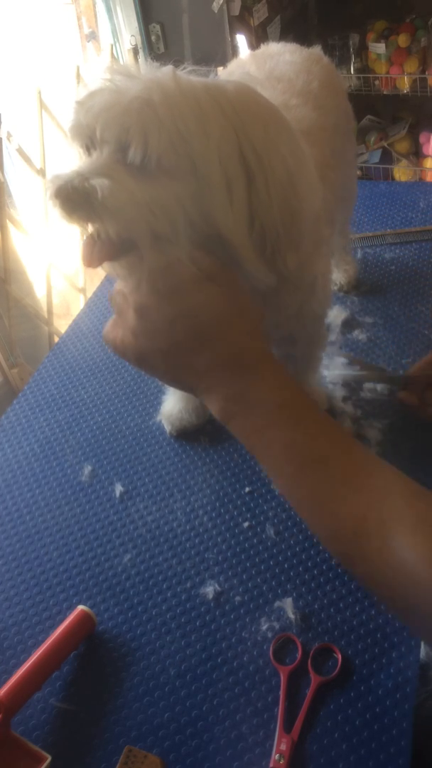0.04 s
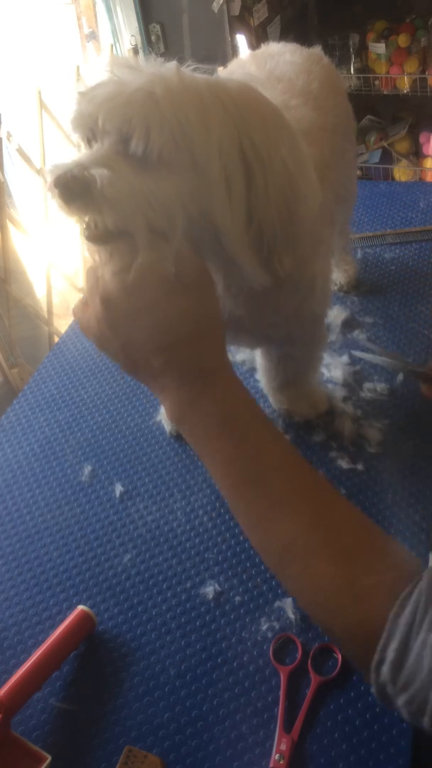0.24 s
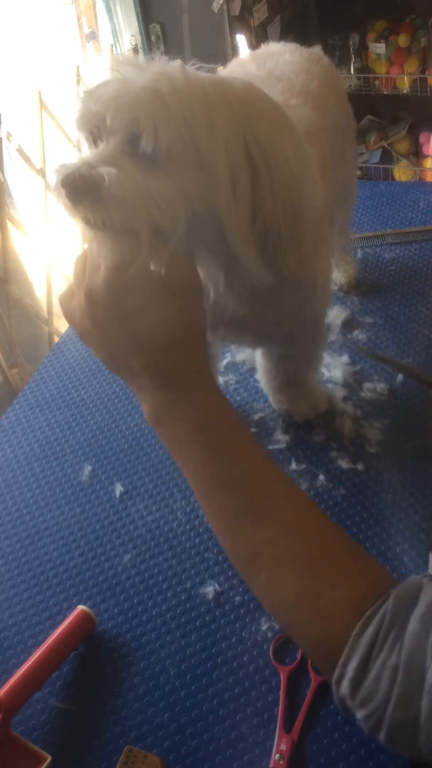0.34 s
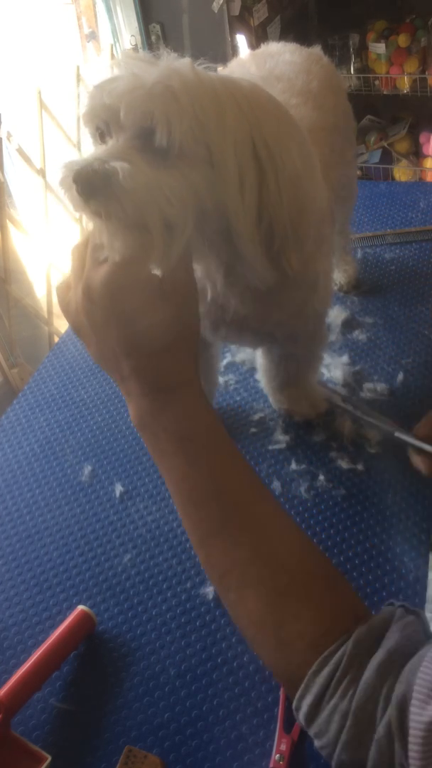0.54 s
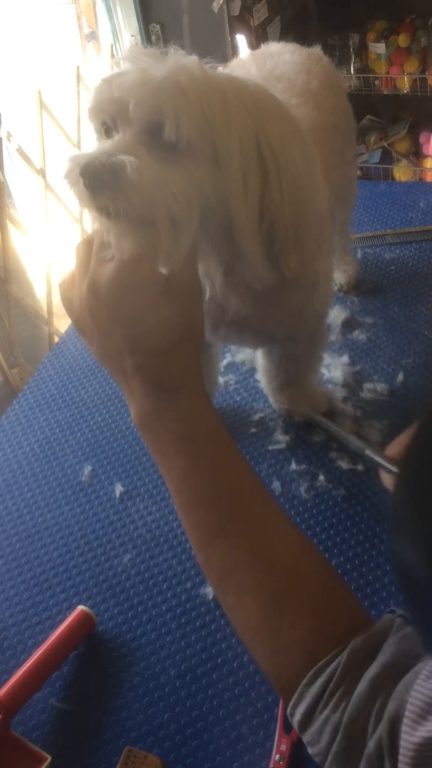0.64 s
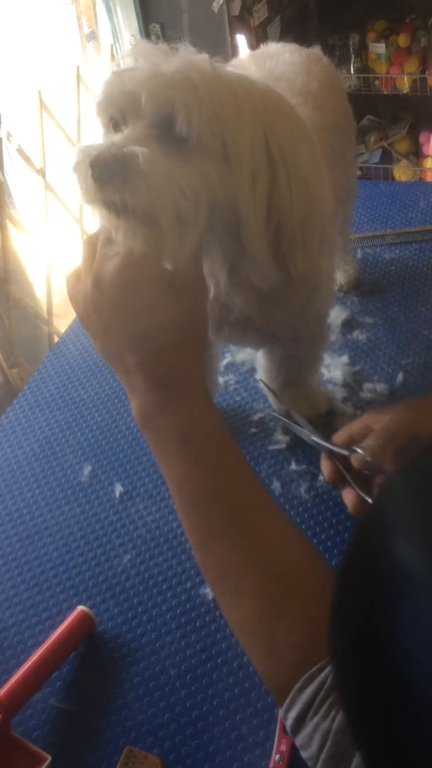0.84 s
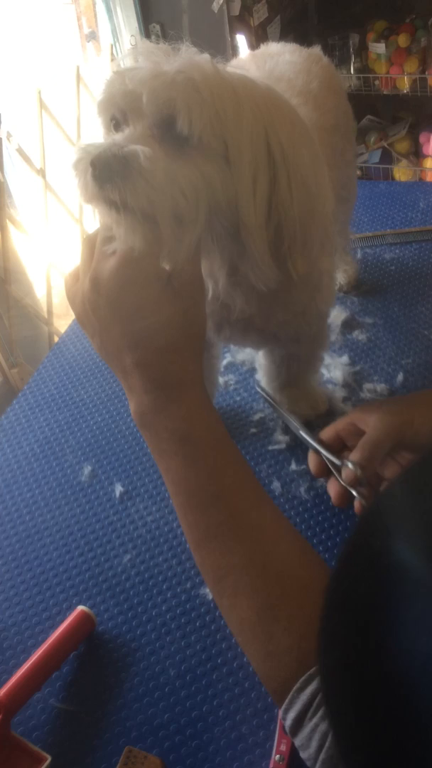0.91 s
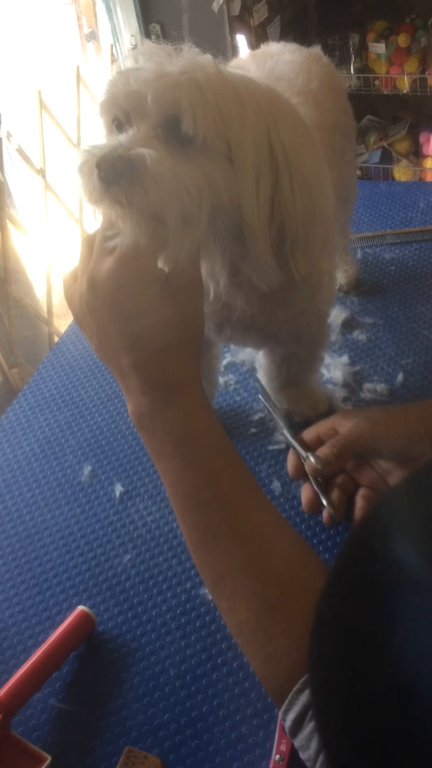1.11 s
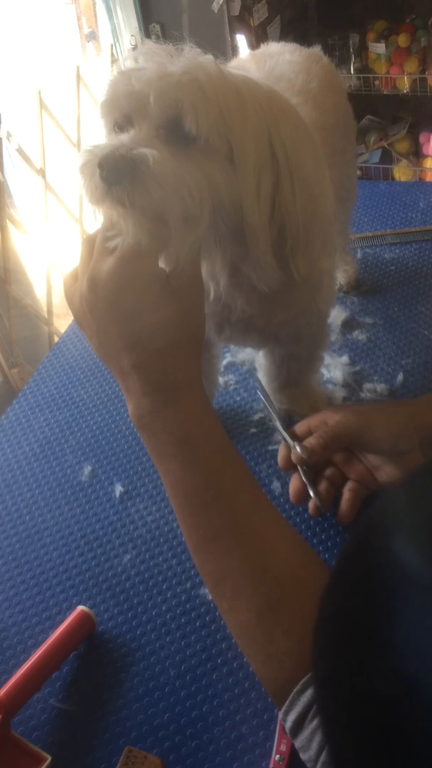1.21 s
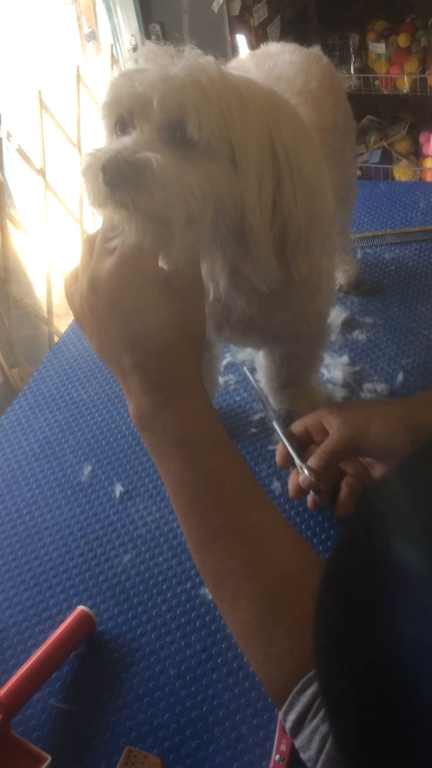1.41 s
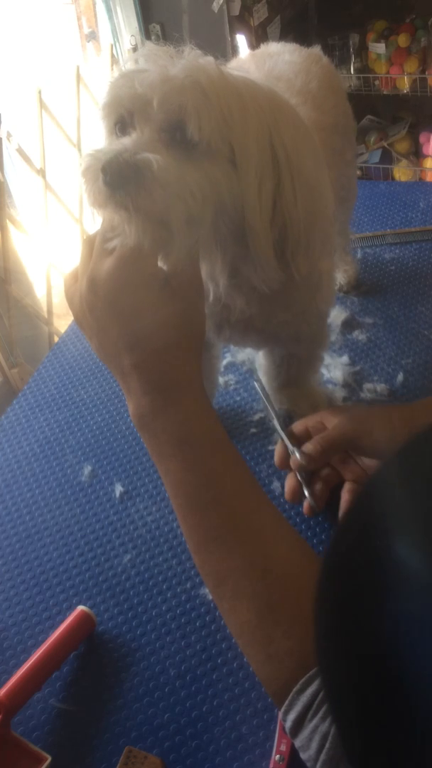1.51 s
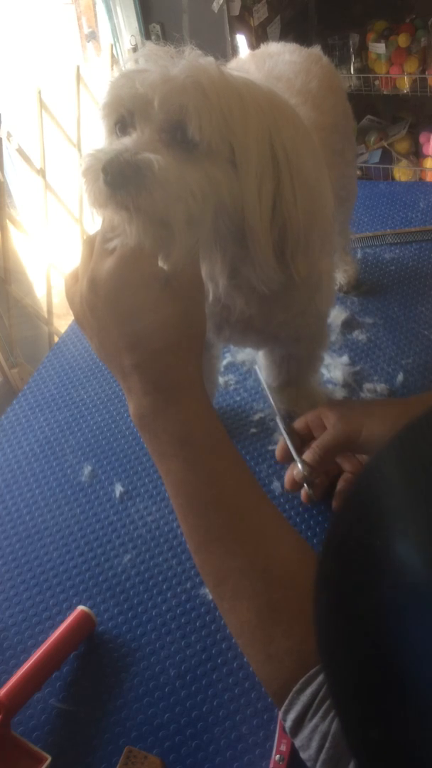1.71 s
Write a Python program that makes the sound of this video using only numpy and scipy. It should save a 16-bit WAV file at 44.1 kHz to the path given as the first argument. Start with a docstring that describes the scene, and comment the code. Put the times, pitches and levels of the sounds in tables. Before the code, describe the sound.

Close scissors snip in a small room, the blades rasping with a thin squeak and clicking shut four times, leaving a faint steel ring. The grooming table thuds softly while distant traffic hums throughout.

```python
"""Steel grooming scissors trim a dog's leg on a table in a small room. A click's steel tail fades first,
over distant traffic in the room's low resonances. Each stroke then rasps with a thin friction squeak.
Two full closings end in sharp clacks, the impact ringing the steel, among soft bumps from the table.
Lighter strokes and faint ticks follow, then two more clacks; thin notes linger under the last stroke."""
import sys
import numpy as np
from scipy import signal
from scipy.fft import rfft, irfft
from scipy.io import wavfile
from scipy.ndimage import uniform_filter1d

SR = 44100
rng = np.random.default_rng(int(sys.argv[2]) if len(sys.argv) > 2 else 0)


def transcribe(signal):
    """Save signal, clipped to [-1, 1], as a 16-bit WAV file at the path in sys.argv[1]."""
    frames = np.atleast_2d(signal).T
    limited = np.clip(frames, -1, 1)
    pcm = np.round(limited * 32767).astype(np.int16)
    wavfile.write(sys.argv[1], SR, pcm)


N = 77175
TIME = np.arange(N) / SR


# the fading steel tail of a click at the very start, then blade strokes:
# (peak time [s], rise [s], fall [s], level [dB], relative squeak [dB])
CLICK_TAIL_AND_STROKES = [(0.001, 0.018, 0.05, -40.5, -32), (0.141, 0.021, 0.046, -42, 1),
                          (0.21, 0.017, 0.039, -33.5, 0.5), (0.368, .022, 0.023, -32, -1.5),
                          (0.399, 0.01346, 0.017, -49, -26), (0.436, .018, .034, -30, -4.5),
                          (0.602, 0.027, 0.022, -36, -1.5), (0.705, .026, .04, -45.5, -10),
                          (0.859, 0.026, 0.035, -38.5, -0.5), (1.048, 0.018, 0.0305, -35, 2),
                          (1.204, 0.03, 0.023, -36.5, 1.5), (1.478, 0.016, .024, -37, 2.5),
                          (1.624, 0.024, .022, -39, 0.5)]
# modes of the blades: (frequency [Hz], bandwidth [Hz], gain [dB])
BLADE_MODES = [(4230, 560, -14.5), (6190, 570, -11), (8270, 1430, -9), (10130, 620, -2), (11420, 194, 0.5),
               (12990, 330, -2), (14500, 400, -1), (15300, 300, -11.5), (15700, 540, -7.5)]

def blade_friction():
    """Stick-slip friction: dense slips excite the blades, and a squeak's pitch follows their speed.
    The same blade modes sound the click's fading tail at the very start."""
    rasp_gain_db, rasp_drop_db, squeak_gain_db, squeak_drop_db = -4, 36, -5, 31
    squeak_hz, sag_hz, waver_hz = 10550, 1700, 310
    slips_per_s = 2200
    rasp_envelope, squeak_envelope, speed = np.zeros((3, N))
    for peak, rise, fall, db, squeak_db in CLICK_TAIL_AND_STROKES:
        # 0 at the peak, 1 at either end
        away = np.minimum(np.maximum((peak - TIME) / rise, (TIME - peak) / fall), 2)
        rasp_envelope += from_db(db - rasp_drop_db * away ** 1.75) * (away < 2)
        squeak_envelope += from_db(db + squeak_db - squeak_drop_db * away ** 2)
        speed = np.maximum(speed, 1 - away ** 2)
    slips = (rng.random(N) < slips_per_s / SR) * rng.choice([-1, 1], N)
    slip_size = from_db(3.8 * np.minimum(rng.exponential(1, N), 4))
    grip = from_db(3 * drift(170))
    rasp = unit_rms(resonate(slips * slip_size * grip, BLADE_MODES))
    pitch = squeak_hz - sag_hz * (1 - speed) + waver_hz * drift(324)
    squeak = unit_rms(sine(pitch) * from_db(4.5 * drift(167)))
    return (from_db(rasp_gain_db) * rasp_envelope * rasp
            + from_db(squeak_gain_db) * squeak_envelope * squeak)


# full closings, then light touches of the blades:
# (time [s], level [dB], bass gain [dB], treble gain [dB], rebound delay [s], rebound gain [dB])
CLOSING_CLACKS = [(0.2244, -20.5, 0, 1, .0025, -7), (0.4440, -15.5, -1, 9, .0016, -2),
                  (1.0639, -19, 3, -3, .0009, 0), (1.4936, -21, 3, -2, .0016, -2)]
BLADE_TOUCHES = [(0.1268, -69, 0, 6, 0.0014, -3), (0.3520, -76, 5, 8, .002, -10),
                 (0.5780, -46, -2, 11, 0.000654, -12), (0.768, -40, 6, -3, 0.002, -23),
                 (1.181, -50, -3, 3, .002, -3), (1.454, -49.5, 39, -7, 0.0027, -7)]
# modes of the struck scissors: (frequency [Hz], bandwidth [Hz], level [dB])
SCISSOR_MODES = [(2850, 700, -25), (4100, 350, -18.5), (4450, 300, -15), (5900, 600, -19), (7070, 130, -3),
                 (7750, 400, -9), (8430, 300, -3), (9400, 550, -8), (10600, 550, -12), (11500, 400, -8),
                 (12380, 320, -1), (12850, 260, -1.5), (14170, 300, -5), (14550, 250, -12),
                 (15450, 300, -17)]

def blade_impacts():
    """Impact excitation: a hit, a rebound and brief chatter ring the modes of the hand-damped steel."""
    bass_edge_hz, treble_edge_hz, mode_spread_db = 6400, 13500, 2
    chatter_s, chatter_db = .0013, 1
    out, t = np.zeros(N), TIME[:SR // 16]
    for start, db, bass_db, treble_db, rebound_s, rebound_db in CLOSING_CLACKS + BLADE_TOUCHES:
        ring = 0
        for hz, width, mode_db in SCISSOR_MODES:
            hits = rng.standard_normal((2, len(t))) * np.exp(-t / chatter_s)
            hits *= from_db(chatter_db) / np.linalg.norm(hits, axis=1, keepdims=True)
            hits[:, 0] += rng.choice([-1, 1], 2)  # an impulse leads each burst of chatter
            force = hits[0] + from_db(rebound_db) * np.roll(hits[1], int(rebound_s * SR))
            colour_db = bass_db * (hz < bass_edge_hz) + treble_db * (hz > treble_edge_hz)
            colour_db += mode_spread_db * rng.standard_normal()
            ring += from_db(mode_db + colour_db) * unit_rms(resonate(force, [(hz, width, 0)]))
        add(out, start, at_level(ring, db, window=88))
    return signal.sosfilt(signal.butter(2, 1500, "high", fs=SR, output="sos"), out + 1e-18)


# notes of the free blades: (time [s], frequency [Hz], level [dB], 60 dB decay time [s])
BLADE_NOTES = [(0.444, 4540, -60, .6), (1.17, 4560, -62, 1.2), (1.40, 11280, -63, 4.0),
               (1.63, 14400, -70, 2.5)]

def blade_ringing():
    """Free vibration: thin, wavering steel notes outlast the strokes and decay exponentially."""
    waver_hz, flutter_db, rise_s = 50, 2.5, .08
    out = np.zeros(N)
    rise = np.minimum(TIME / rise_s, 1)
    for start, hz, db, t60 in BLADE_NOTES:
        note = sine(hz + waver_hz * drift(100))
        gain = from_db(db + flutter_db * drift(30))
        add(out, start, gain * rise * note * decay(TIME, t60))
    return out


# soft bumps on the table: (time [s], thud level [dB], knock level [dB])
TABLE_BUMPS = [(0.171, -45, -55), (0.217, -44, -72), (0.476, -33, -53), (0.553, -68, -46),
               (0.607, -56, -48), (1.112, -40, -49.5), (1.396, -60, -43.5)]
# modes of the thud, then of the knock: (frequency [Hz], bandwidth [Hz], gain [dB])
TABLE_LOW_MODES = [(61.6, 18, -2.5), (101.4, 12.3, 9.5), (167, 30, -19.5)]
TABLE_MID_MODES = [(230, 68, 3.5), (490, 92, 8), (720, 316, 0), (1250, 870, -14)]

def table_bumps():
    """Damped resonance: the table answers an impulse with a thud and a short scuff with a dull knock."""
    scuff_s = .017
    out, t = np.zeros(N), TIME[:SR // 3]
    lowpass = signal.butter(2, 300, fs=SR, output="sos")
    for start, thud_db, knock_db in TABLE_BUMPS:
        thud = signal.sosfilt(lowpass, resonate(signal.unit_impulse(len(t)), TABLE_LOW_MODES))
        scuff = rng.standard_normal(len(t)) * np.exp(-t / scuff_s)
        knock = resonate(scuff, TABLE_MID_MODES)
        add(out, start, at_level(thud, thud_db, window=441) + at_level(knock, knock_db, window=441))
    return out


# faint, duller ticks further off: (time [s], level [dB])
DISTANT_TICKS = [(0.718, -53.5), (0.920, -62)]

def distant_ticks():
    """Diffuse field: far ticks arrive mostly as reverberation, a decaying wash of filtered noise."""
    out, t = np.zeros(N), TIME[:SR // 4]
    for start, db in DISTANT_TICKS:
        wash = rng.standard_normal(len(t)) * decay(t, t60=.23)
        tick = resonate(wash, [(7050, 2600, -2.02), (8840, 390, .17)])
        add(out, start, at_level(tick, db, window=220))
    return out


# spectrum of distant traffic and room air: (frequency [Hz], relative spectral density [dB])
TRAFFIC_SPECTRUM = [(20, -34), (40, 5.5), (55, 5), (80, 6), (130, 0), (168, 3), (240, -7.5), (310, -8.5),
                    (385, -16.5), (470, -9), (800, -10.5), (1100, -12), (1500, -19.5), (2400, -20),
                    (3200, -26), (4500, -27.5), (7000, -33.5), (10000, -42), (16000, -62.5)]
# swell of two room modes: (time [s], lower mode level [dB], upper mode level [dB])
ROOM_MODE_LEVELS = [(0.0, -66, -48.5), (0.048, -39.5, -46.5), (0.112, -47.5, -62), (0.154, -54, -64),
                    (0.224, -33.5, -47.5), (0.336, -55.5, -65), (0.496, -39.5, -40.5), (0.554, -47, -55),
                    (0.672, -41.5, -39.5), (0.814, -35.5, -70), (0.9, -48.5, -49.5), (0.926, -44, -52),
                    (1.11, -41, -46.5), (1.262, -50.5, -61.5), (1.418, -49, -46.5), (1.53, -67, -68.5),
                    (1.636, -69, -47.5), (1.75, -59, -50.5)]

def traffic():
    """Standing waves: two low room modes swell and fade over the broadband hum of distant traffic."""
    hum_db, wander_hz = -47.5, 2.3
    lower_hz, upper_hz, lower_gain_db = 63.17, 103, -3.5
    hz, db = np.transpose(TRAFFIC_SPECTRUM)
    colour = from_db(np.interp(np.log(np.fft.rfftfreq(N, 1 / SR) + 1), np.log(hz), db))
    out = from_db(hum_db) * unit_rms(irfft(rfft(rng.standard_normal(N)) * colour, N))
    times, lower_db, upper_db = np.transpose(ROOM_MODE_LEVELS)
    for mode_hz, mode_db in ((lower_hz, lower_db + lower_gain_db), (upper_hz, upper_db)):
        boom = np.sqrt(2) * sine(mode_hz + wander_hz * drift(10.6))
        out += boom * from_db(np.interp(TIME, times, mode_db))
    return out


def room(direct):
    """Reverberation: dense reflections follow the direct sound and die quickly in the small room."""
    delay_s, reflections_db = .004, -11.5
    t = TIME[:SR // 2]
    tail = rng.standard_normal(len(t)) * decay(t, t60=.145) * (t > delay_s)
    reflections = signal.fftconvolve(direct, tail / np.linalg.norm(tail))[:N]
    return direct + from_db(reflections_db) * reflections


def resonate(force, modes):
    """Modal superposition, signs alternating, of (frequency [Hz], bandwidth [Hz], gain [dB])."""
    out = 0
    for k, (hz, width, db) in enumerate(modes):
        r = np.exp(-np.pi * width / SR)
        feedback = [1, -2 * r * np.cos(2 * np.pi * hz / SR), r * r]
        response = signal.lfilter([1, 0, -1], feedback, force + 1e-18)
        out += (-1) ** k * from_db(db) * (1 - r * r) / 2 * response
    return out


def drift(rate_hz):
    """Random fluctuation: low-passed noise of unit rms."""
    r = np.exp(-2 * np.pi * rate_hz / SR)
    return unit_rms(signal.lfilter([1], [1, -2 * r, r * r], rng.standard_normal(2 * N))[N:])


def sine(hz):
    """Phase is the integral of frequency."""
    return np.sin(2 * np.pi * np.cumsum(hz) / SR)


def decay(t, t60):
    """Exponential damping: 60 dB in t60 seconds."""
    return np.exp(-np.log(1000) * t / t60)


def from_db(db):
    """Decibels to amplitude ratio."""
    return 10 ** (np.asarray(db) / 20)


def unit_rms(x):
    """Normalisation to unit power."""
    return x / np.sqrt(np.mean(x ** 2) + 1e-20)


def at_level(x, db, window):
    """Short-time rms: the loudest `window` samples are brought to the given level."""
    return x * from_db(db) / np.sqrt(uniform_filter1d(x * x, window).max() + 1e-20)


def add(out, start_s, x):
    """Superposition of x from start_s on."""
    i = int(start_s * SR)
    out[i:i + len(x)] += x[:N - i]


def scene():
    """Superposition: scissors and table sound in the room, over far ticks and traffic."""
    direct = blade_friction() + blade_impacts() + blade_ringing() + table_bumps()
    return (room(direct) + distant_ticks() + traffic())[None]


def record(dry):
    """Band limiting: a steep low-pass removes the highest treble."""
    cutoff_hz = 15900
    return signal.sosfilt(signal.ellip(10, .2, 70, cutoff_hz, fs=SR, output="sos"), dry)


dry = scene()
out = record(dry)
transcribe(out)
```